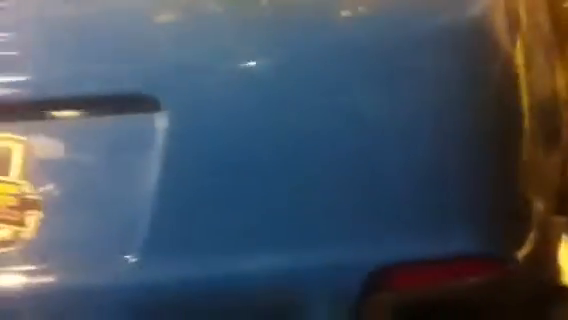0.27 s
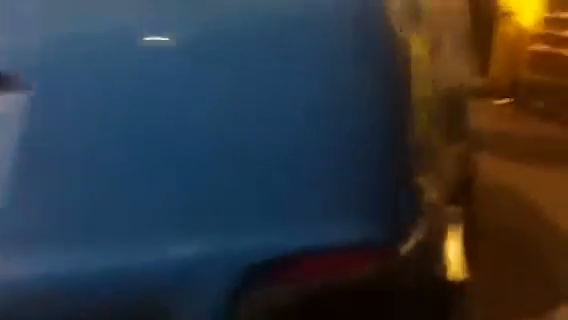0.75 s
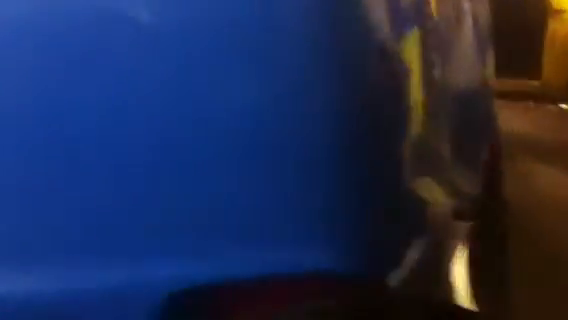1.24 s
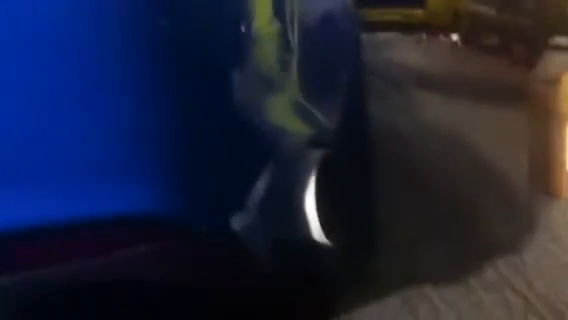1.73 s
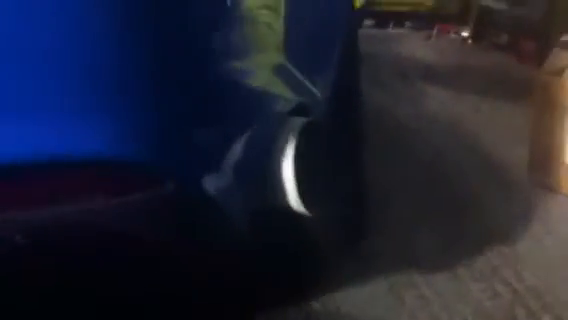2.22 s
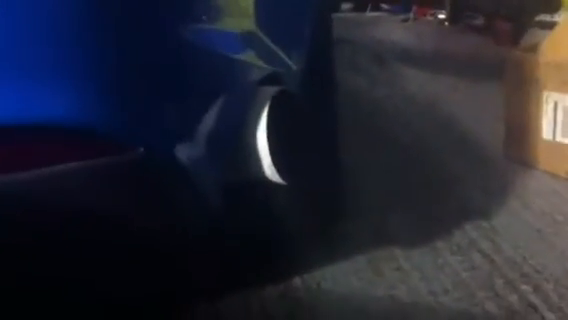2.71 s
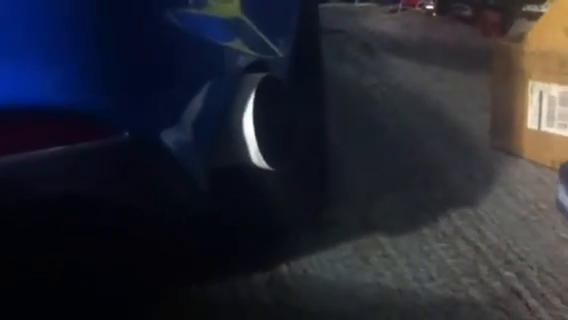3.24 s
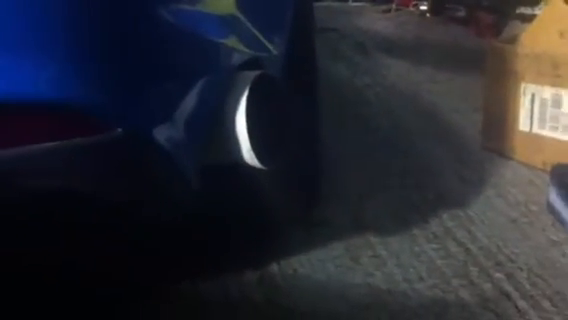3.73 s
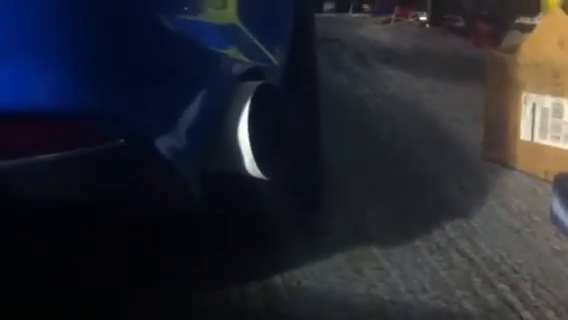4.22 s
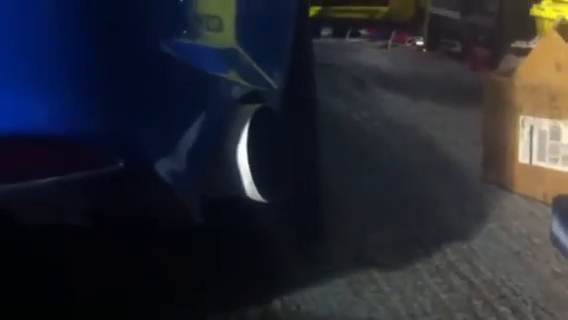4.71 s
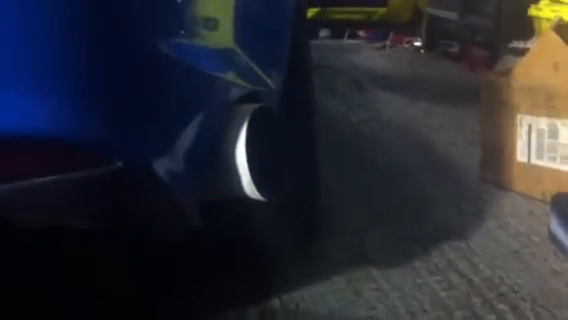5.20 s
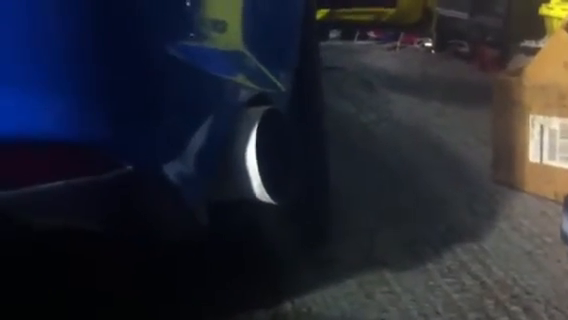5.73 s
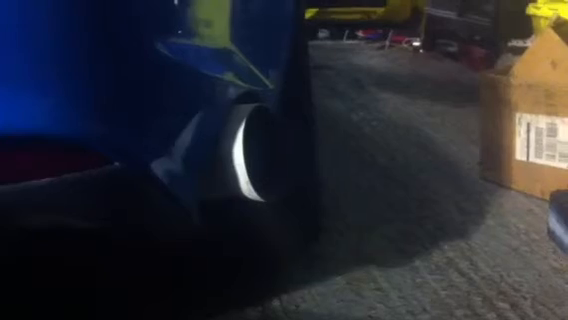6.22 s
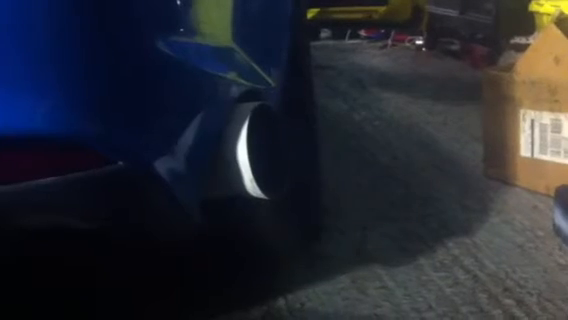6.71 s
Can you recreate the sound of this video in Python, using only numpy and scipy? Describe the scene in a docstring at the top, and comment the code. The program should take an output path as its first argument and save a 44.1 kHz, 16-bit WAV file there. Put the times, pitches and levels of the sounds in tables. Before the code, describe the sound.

Loud continuous lumpy idling from the rear of a car indoors. Low exhaust pulses stutter in short fast runs with tiny gaps, ringing the pipe wall and pushing out airy gas. The sound shifts after the first second as the small microphone sinks from above the tail to beside the outlet, the hiss becoming fuller. Low garage boom, mechanical clatter, thin whines and fleeting hums fill the background; peaks are rounded and dense.

```python
"""In a garage, at the tail of a big exhaust pipe, a rotary race engine lopes at idle.
Firings keep an even beat within short runs, with many beats skipped or doubled between them.
Each firing rings the exhaust as a thump with a knock of the pipe wall, and pushes out a puff of hissing gas;
behind are garage boom, noise-fed clatter and whines, and a panel that hums in swells.
One small microphone sinks from above the tail to beside the pipe, driven close to overload."""
import sys
import numpy as np
from scipy import signal
from scipy.fft import rfft, irfft
from scipy.io import wavfile

SR = 44100
rng = np.random.default_rng(int(sys.argv[2]) if len(sys.argv) > 2 else 0)


def bounce(signal):
    """Save signal as a 16-bit WAV file at the path given by the first command-line argument."""
    frames = np.transpose(np.atleast_2d(signal))
    limited = np.clip(frames, -1, 1)
    pcm = np.round(limited * 32767).astype(np.int16)
    wavfile.write(sys.argv[1], SR, pcm)


N = 306495


def from_db(db):
    """Decibels to gain."""
    return 10 ** (np.asarray(db) / 20)


def rms_one(x):
    """Scale to rms 1."""
    return x / np.sqrt(np.mean(x ** 2) + 1e-20)


def in_time(rows):
    """A curve of (time, value) rows, joined by straight lines sample by sample."""
    return np.interp(np.arange(N) / SR, *np.transpose(rows))


def drift(rate_hz):
    """Slow chance: noise through a double one-pole low-pass; rms 1."""
    r = np.exp(-2 * np.pi * rate_hz / SR)
    noise = rng.standard_normal(N + SR)
    settled = signal.lfilter([1], [1, -2 * r, r * r], noise)[SR:]
    return rms_one(settled)


def coloured(spectrum):
    """Noise shaped by (frequency, level) points joined on a log-frequency axis; rms 1."""
    hz = np.arange(N // 2 + 1) * SR / N + 1   # 1 Hz up, to keep the logarithm finite
    point_hz, point_db = np.transpose(spectrum)
    gain = from_db(np.interp(np.log(hz), np.log(point_hz), point_db))
    return rms_one(irfft(rfft(rng.standard_normal(N)) * gain, N))


def band_pass(x, order, band_hz):
    """Butterworth band-pass."""
    return signal.sosfilt(signal.butter(order, band_hz, "band", fs=SR, output="sos"), x)


def resonate(x, hz, width_hz):
    """Two-pole resonance, gain 1 on top."""
    r = np.exp(-np.pi * width_hz / SR)
    feedback = [1, -2 * r * np.cos(2 * np.pi * hz / SR), r * r]
    return signal.lfilter([(1 - r * r) / 2, 0, (r * r - 1) / 2], feedback, x)


def humming(modes):
    """Noise passed twice through each resonance, each at its own level."""
    total = np.zeros(N)
    for hz, width_hz, level_db in modes:
        once = resonate(rng.standard_normal(N), hz, width_hz)
        total += from_db(level_db) * rms_one(resonate(once, hz, width_hz))
    return total


def humming_along(modes, near):
    """Resonances whose dB level moves between two values along the microphone's path."""
    return sum(from_db(above_db + near * (beside_db - above_db)) * humming([(hz, width_hz, 0)])
               for hz, width_hz, above_db, beside_db in modes)


TURN_S = 0.0275   # nominal spacing of firings within a run
# One rotor catches for a short run of turns, then misses while the other takes over; relative levels:
# first_firing_s, last_firing_s, first_thump_db, inner_thump_db, last_thump_db, first_knock_db, first_hiss_db
FIRING_RUNS = [(0.0028, 0.0601, -3.5, -9, -7, -26, -33), (0.0748, 0.1594, -5.5, -7.6, -8, -41, -44),
               (0.1737, 0.23, -3, -12, -5, -27, -36.5), (0.2735, 0.3298, -3, -6, -3.6, -21, -32.5),
               (0.344, 0.3956, -3, -13, -6.5, -24, -38), (0.4362, 0.4884, -6.5, -8.4, -3, -24.5, -36.5),
               (0.529, 0.582, -6, -6, -6.5, -24, -33.5), (0.6236, 0.6782, -3, -8.8, -6, -21, -33.5),
               (0.721, 0.807, -4.8, -7.5, -14, -26, -34.5), (0.793, 0.878, -2.5, -9, -9, -24, -38),
               (0.92, 0.9773, -4, -9.8, -5.5, -27.5, -32.5), (0.9922, 1.076, -5.5, -6.5, -5.3, -46, -33),
               (1.0894, 1.143, -2.5, -12, -3, -25, -35), (1.1854, 1.2391, -4.5, -5.8, -3.5, -23, -33),
               (1.281, 1.3368, -5.5, -7.5, -4.5, -24, -34.1), (1.35, 1.4027, -2.5, -11.5, -5, -27, -37.5),
               (1.4737, 1.5312, -7, -7.5, -10, -36, -35.3), (1.546, 1.6001, -3.1, -8, -3.8, -29, -36.5),
               (1.6416, 1.6965, -4.8, -5.4, -4.3, -24.5, -32), (1.7092, 1.7901, -5, -5.1, -4.5, -27, -33.5),
               (1.8027, 1.856, -4.5, -6.6, -5.5, -27.5, -31.9),
               (1.8955, 1.9528, -2.5, -6.5, -3.3, -25, -32.5), (1.9946, 2.051, -3.2, -5, -2.5, -26.5, -30),
               (2.0946, 2.151, -3.5, -5.5, -3, -27, -34.5), (2.1915, 2.2461, -2, -3.4, -4.1, -31, -30.5),
               (2.2592, 2.3111, -3.5, -6.5, -7, -31.0, -38), (2.3786, 2.4338, -7, -4, -5.5, -32, -30.5),
               (2.4474, 2.5005, -3, -7, -5, -29, -41), (2.54, 2.595, -5, -7.1, -5, -31, -33.5),
               (2.611, 2.6921, -8, -4, -4.0, -28.5, -34.5), (2.733, 2.7889, -3.5, -5, -4, -26.0, -30.5),
               (2.8313, 2.888, -3.5, -8, -5.3, -28, -33.2), (2.9315, 2.9871, -4.2, -6.9, -4, -30, -31.5),
               (3.0, 3.0524, -5.5, -8, -5.5, -44, -37.5), (3.0913, 3.1472, -4, -8, -5, -29, -33.5),
               (3.1602, 3.2118, -6, -6.2, -6, -28, -35), (3.2514, 3.2786, -3.5, -5.2, -4.5, -27, -32),
               (3.349, 3.4065, -3.3, -3.5, -15, -30.0, -30.5), (3.392, 3.4462, -6, -7.5, -4, -30, -39.5),
               (3.5167, 3.572, -4.4, -8.5, -9, -33.0, -28.5), (3.559, 3.612, -3.5, -8, -5.5, -24.5, -40),
               (3.652, 3.7059, -7, -4, -5, -30, -33), (3.7485, 3.805, -5.5, -5.9, -6, -30.0, -30),
               (3.848, 3.9051, -4, -6, -3.5, -29, -31.5), (3.947, 4.0027, -4.5, -6.6, -3.5, -28, -33),
               (4.015, 4.0933, -5.5, -6, -5, -46, -37), (4.1036, 4.1558, -4.5, -8, -12.5, -35, -35.5),
               (4.2206, 4.2758, -3, -6.5, -4.5, -28.5, -31.5), (4.3176, 4.3726, -4.7, -5.5, -4, -32, -30),
               (4.3876, 4.4679, -7, -3.9, -3.5, -31, -35.5), (4.4807, 4.5339, -4.5, -5, -4, -27, -30.5),
               (4.607, 4.6643, -4.5, -6.5, -6.7, -28.0, -33.5),
               (4.677, 4.734, -4.0, -5.5, -5.4, -26.5, -30.5), (4.776, 4.831, -4, -7.5, -4.5, -27.5, -35.0),
               (4.872, 4.9265, -3.5, -4.5, -4.3, -28, -33), (4.9676, 5.0213, -2.5, -4.4, -3, -28, -32.5),
               (5.0354, 5.1167, -5.5, -5, -4.5, -30.0, -33.5), (5.128, 5.1818, -3.5, -11, -6, -42, -39),
               (5.2517, 5.3095, -7.7, -9, -9, -39.0, -38), (5.2967, 5.376, -3, -3.4, -6, -30, -36.5),
               (5.416, 5.4707, -3.5, -4, -6, -28, -29.5), (5.5142, 5.5705, -4.0, -4.5, -3, -30, -35.5),
               (5.612, 5.6687, -3, -4, -3.5, -29, -29.5), (5.681, 5.7347, -6.5, -10, -7.8, -26.0, -41),
               (5.7745, 5.8299, -7.5, -8.9, -5, -37, -34.3), (5.871, 5.9279, -5, -7.2, -4.5, -28.5, -34),
               (5.9695, 6.0248, -5, -5, -3.9, -28.0, -32.5), (6.0671, 6.1218, -3.8, -6.2, -3.7, -31, -33.5),
               (6.1352, 6.1867, -6, -5.5, -5.2, -30, -34), (6.2263, 6.2792, -4.0, -4, -3, -26.0, -34),
               (6.3181, 6.3726, -3.5, -6, -4, -24, -27), (6.386, 6.439, -3.6, -4.8, -5, -34.0, -34.5),
               (6.48, 6.5352, -4, -6.6, -3.0, -31, -33), (6.55, 6.6021, -3.7, -7, -6.4, -29, -37.5),
               (6.6427, 6.6986, -6.5, -7, -4.5, -30.0, -33.5), (6.7424, 6.7976, -2.5, -6.6, -3.3, -27, -34),
               (6.811, 6.8643, -5, -6.8, -5.5, -32, -33.5), (6.9053, 6.9333, -3, -4.9, -8, -25.0, -31.5)]


def firings():
    """Every firing of every run in time order; rows: time_s, thump_db, knock_db, hiss_db."""
    inner_late_s, restart_late_s, pause_s = 0.00032, 0.00066, 0.05
    later_knock_db, hiss_fade_db = -4.0, -3.5   # knocks after the first; hiss from first to last firing
    rows, previous_last = [], 0
    for first, last, first_db, inner_db, last_db, knock_db, hiss_db in FIRING_RUNS:
        along = np.linspace(0, 1, round((last - first) / TURN_S) + 1)
        inner = (along > 0) & (along < 1)
        # the shaft speeds up within a run, more so after a pause, so inner firings fall late
        late = inner_late_s + restart_late_s * (first - previous_last > pause_s)
        times = first + along * (last - first) + late * inner
        thump_db = np.where(inner, inner_db, np.where(along > 0, last_db, first_db))
        rows += zip(times, thump_db, knock_db + later_knock_db * (along > 0), hiss_db + hiss_fade_db * along)
        previous_last = last
    return np.array(sorted(rows)).T


THUMP, KNOCK, GAS = 1, 2, 3   # level rows of firings()


def firing_train(early_s, spread_db=0, level=THUMP):
    """One click per firing, moved early by the rise time of what it excites, its level varied by chance."""
    rows = firings()
    times, level_db = rows[0], rows[level]
    at = np.clip(((times - early_s) * SR).astype(int), 0, N - 1)
    clicks = np.zeros(N)
    clicks[at] = from_db(level_db + spread_db * rng.standard_normal(len(times)))
    return clicks


def rise_and_fall(rise_s, fall_s):
    """Poles of two one-pole smoothers in a row, and their recursion."""
    rise, fall = np.exp(-1 / (rise_s * SR)), np.exp(-1 / (fall_s * SR))
    return rise, fall, np.convolve([1, -rise], [1, -fall])


def after_firing(early_s, rise_s, fall_s, steady, spread_db):
    """Envelope that swells at each firing and dies back to a steady share; rms 1."""
    feedback = rise_and_fall(rise_s, fall_s)[2]
    swell = signal.lfilter([1], feedback, firing_train(early_s, spread_db))
    return rms_one(rms_one(swell) + steady)


# A panel humming in swells, levels before the panel's gain: start_s, length_s, level_db
PANEL_SWELLS = [(0.535, 0.052, -45), (0.667, 0.03, -48), (1.562, 0.054, -48), (1.652, 0.21, -34),
                (1.916, 0.032, -46), (2.154, 0.053, -44), (2.217, 0.11, -38.5), (2.377, 0.29, -42),
                (2.664, 0.067, -39.5), (2.983, 0.06, -41), (3.083, 0.26, -37), (3.667, 0.052, -41),
                (3.894, 0.031, -47), (3.999, 0.082, -45), (4.165, 0.144, -40.5), (4.418, 0.15, -34),
                (4.694, 0.045, -41), (4.888, 0.32, -37), (5.309, 0.096, -35), (5.46, 0.038, -42),
                (5.533, 0.045, -41), (5.617, 0.072, -43), (5.727, 0.132, -40), (6.008, 0.054, -40),
                (6.18, 0.33, -35.5), (6.599, 0.05, -42), (6.792, 0.062, -35)]


def panel_swells():
    """Each swell rounds up to a crest and sinks again over a faint steady hum."""
    crest_share, tail_s, faint_db = 0.51, 0.035, -50.5   # crest as a share of the length
    t = np.arange(N) / SR
    level = from_db(faint_db)
    for start, length, level_db in PANEL_SWELLS:
        corners = [start, start + crest_share * length, start + length + tail_s]
        level = level + from_db(level_db) * np.sin(np.interp(t, corners, [0, np.pi / 2, np.pi]))
    return level


def panel():
    """One sine hum with wavering pitch and flickering level, following the swells."""
    pitch_hz, waver_hz, gain_db, flicker_db = 711, 4.02, 4.5, 1.2
    cycles = np.cumsum(pitch_hz + waver_hz * drift(14.7)) / SR
    return panel_swells() * from_db(gain_db + flicker_db * drift(25)) * np.sin(2 * np.pi * cycles)


# Pitch of each engine whine: pitch_hz
WHINE_PITCHES = [860, 1797, 1990, 2065, 2199, 2547, 3325, 3623]
# The same whines, levels against the clatter: width_hz, above_db, beside_db
WHINE_LEVELS = [(23.148, -24, -25), (17.8, -32, -8), (59.7, -12.5, -11), (54.5, -7.5, -6), (28, -27, -16),
                (25, -20, -27.5), (59.7, -19, -17), (31, -21, -17.5)]
# Broad engine clatter, relative spectrum: frequency_hz, level_db
CLATTER_SPECTRUM = [(260, -45), (450, -13), (715, -0.5), (850, -6), (963, -4.5), (1340, -13.5), (2040, -7),
                    (2340, -18), (4500, -17), (5850, -16.5), (9900, -120)]
# Engine noise over time, before its slow drift: time_s, clatter_level_db
ENGINE_LOAD = [(0, -34), (.8, -35.5), (1.2, -34), (1.8, -35), (2.4, -37), (3.5, -38), (4.5, -36.5),
               (5.5, -37), (6.95, -37)]


def engine(near):
    """Noise-fed clatter and narrow whines, drifting and throbbing a little with the firings, plus the panel."""
    whine_modes = [(hz, *rest) for hz, rest in zip(WHINE_PITCHES, WHINE_LEVELS)]
    parts = coloured(CLATTER_SPECTRUM) + humming_along(whine_modes, near)
    throb = after_firing(early_s=0.0067, rise_s=0.002, fall_s=0.025, steady=9.0, spread_db=3.0)
    level = from_db(in_time(ENGINE_LOAD) + 1.65 * drift(4.2))
    return level * throb * parts + panel()


# Now and then the pipe spits an extra gust, on the scale of the firings' hiss: time_s, level_db
GAS_SPITS = [(0.7477, -36), (1.076, -36), (4.5027, -34), (4.705, -38), (5.0594, -36), (5.438, -32)]


def flow():
    """Gas flow in the pipe: filled by each firing and spit, draining in the pauses."""
    rest_db = -43.5
    rise, fall, feedback = rise_and_fall(rise_s=0.0041, fall_s=0.029)
    slugs = firing_train(early_s=0.0058, spread_db=2.0, level=GAS)
    for time, level_db in GAS_SPITS:
        slugs[round(time * SR)] += from_db(level_db)
    # this gain makes the mean flow equal the slug level when one comes every turn
    gain = TURN_S * SR * (1 - rise) * (1 - fall)
    return signal.lfilter([gain], feedback, slugs) + from_db(rest_db)


# Jet hiss, relative spectrum: frequency_hz, level_db (per Hz)
HISS_SPECTRUM = [(1410, -51), (2400, -5.5), (2680, -11), (3080, -11), (3410, -4.5), (4420, -9.5),
                 (4860, -7.5), (5810, 1), (6590, -0.5), (7300, -4), (8730, 0.5), (10600, -4.5),
                 (13000, -6.5), (15600, -18)]


def gas():
    """Jet hiss: noise that follows the flow, puffs slightly at each firing, and flares band by band."""
    puffs = after_firing(early_s=0.0045, rise_s=0.0014, fall_s=0.0072, steady=12.5, spread_db=5.0)
    hiss = coloured(HISS_SPECTRUM)
    edges_hz = np.geomspace(2000, 19000, 10)
    patchy = np.zeros(N)
    for k, band_hz in enumerate(zip(edges_hz, edges_hz[1:])):
        flare = from_db(2.07 * drift(18.0))
        patchy += (-1) ** k * band_pass(hiss, 2, band_hz) * flare   # neighbours in opposite sign
    return from_db(-2.0) * flow() * puffs * rms_one(patchy)


# Garage boom heard from the two places: pitch_hz, width_hz, above_db, beside_db
BOOM_MODES = [(113.7, 22, -36.5, -37.5), (147.3, 18.5, -32, -38.5), (179.3, 26, -26.5, -30.5),
              (219.6, 21, -30.5, -29.5), (256, 35, -34.5, -34.5), (323.3, 8.4, -37, -38),
              (366.4, 23, -41, -43), (392.6, 4.2, -40, -44), (421.8, 31, -38.5, -41.5),
              (465.4, 26, -51.5, -47.5)]


def garage_boom(near):
    """Low room resonances fed with noise and stirred by every firing."""
    stir = after_firing(early_s=0.0015, rise_s=0.0013, fall_s=0.062, steady=0.44, spread_db=1.0)
    return humming_along(BOOM_MODES, near) * stir


# Pipe wall rattled by the passing gas: pitch_hz, width_hz, level_db
WALL_MODES = [(587, 83, -49.5), (957, 54, -48.5), (1390, 920, -46)]


def wall_rattle():
    """Noise-fed pipe-wall resonances, strongest around each firing."""
    return humming(WALL_MODES) * after_firing(early_s=0.0073, rise_s=0.0019, fall_s=0.021, steady=0.36,
                                              spread_db=6)


def overload_bumps():
    """Close firing pairs overload the microphone unevenly: a low bump, strong when both are strong."""
    times, level_db = firings()[:2]
    close = np.diff(times) < 0.016
    pair_db = (level_db[1:] + level_db[:-1])[close]
    bumps = np.zeros(N)
    bumps[(times[1:][close] * SR).astype(int)] = from_db(1.37 * pair_db - 18.5)
    return signal.fftconvolve(bumps, signal.windows.hann(round(0.0082 * SR)), "same")


def knock(blows, hz, width_hz):
    """The pipe wall swells up and dies within a few cycles; swell crest 1 for a unit blow."""
    t = np.arange(SR // 10) / SR
    swell = np.e * np.pi * width_hz * t * np.exp(-np.pi * width_hz * t)
    return signal.fftconvolve(blows, swell * np.sin(2 * np.pi * hz * t))[:N]


def wall_knocks(near):
    """One knock per firing, crossfaded between a lower, duller ring above and a higher, longer one beside."""
    blows = firing_train(early_s=0.00702, spread_db=1.5, level=KNOCK)
    above = knock(blows, hz=930, width_hz=93)
    beside = knock(blows, hz=960, width_hz=74)
    return (1 - near) * above + near * beside


# The silencer heard from above the tail: band_hz (low, high); echoes: delay_s, signed_share;
# cavities: pitch_hz, signed_gain (at resonance), t60_s
PIPE_ABOVE = dict(band_hz=(178.8, 238.4), echoes=[(.0069, -0.019), (.0179, -0.21), (.0379, 0.15)],
              cavities=[(106.6, 12.5, 0.078), (139.7, 2, 0.21), (306, 0.59, 0.0079), (391.3, 37.5, 0.31),
              (445, -3, 0.02)])
# The silencer heard from beside the pipe, same columns
PIPE_BESIDE = dict(band_hz=(151.4, 233.5), echoes=[(.0127, 0.36), (.0188, 0.21), (.029, -0.17),
               (.0359, -.24), (.0464, 0.25)], cavities=[(106, 8, 0.11), (141.15, 2.5, 0.091),
               (328, 3, 0.025), (321.2, 5, 0.37), (396, -5, 0.32), (407.2, -9.5, 0.16)])


def thump(band_hz, echoes, cavities):
    """Firings through echoes, ringing cavities and the silencer's pass band; unit peak at each firing time."""
    t = np.arange(SR // 2) / SR
    pulse = 1. * (t == 0)
    for delay, share in echoes:
        pulse[round(delay * SR)] += share
    for hz, gain, t60 in cavities:
        decay = np.log(1000) / t60
        pulse += 2 * gain * decay / SR * np.exp(-decay * t) * np.sin(2 * np.pi * hz * t)
    pulse = band_pass(pulse, 3, band_hz)
    top = np.argmax(pulse)
    return signal.fftconvolve(firing_train(0), pulse / pulse[top])[top:top + N]


def exhaust(near):
    """Thumps and knocks as heard along the microphone's path, with boom, wall rattle and overload bumps."""
    thumps = (1 - near) * thump(**PIPE_ABOVE) + near * thump(**PIPE_BESIDE)
    pipe = from_db(0.46) * thumps + from_db(-1.5) * wall_knocks(near)
    return pipe + garage_boom(near) + wall_rattle() - overload_bumps()   # bumps go negative


# Microphone path: time_s, nearness (0 above the tail, 1 beside the pipe)
MICROPHONE_PATH = [(0, 0.02), (.9, 0.081), (1.3, 0.62), (1.8, 0.92), (6.95, 0.85)]


def scene():
    """Engine, gas and exhaust reach one moving microphone."""
    near = np.clip(in_time(MICROPHONE_PATH), 0, 1)
    return (engine(near) + gas() + exhaust(near))[None]


def record(dry):
    """Bass roll-off of the small capsule, peaks rounded near overload, the top cut."""
    ceiling, cutoff_hz = 0.85, 15700
    thin = signal.sosfilt(signal.butter(2, 15, "high", fs=SR, output="sos"), dry)
    rounded = thin / (1 + np.abs(thin / ceiling) ** 4) ** 0.25
    return signal.sosfilt(signal.ellip(12, 0.5, 70, cutoff_hz, fs=SR, output="sos"), rounded)


dry = scene()
out = record(dry)
bounce(out)
```